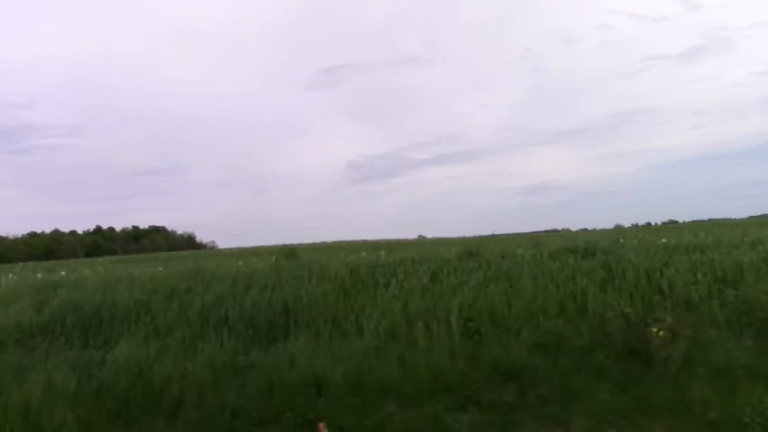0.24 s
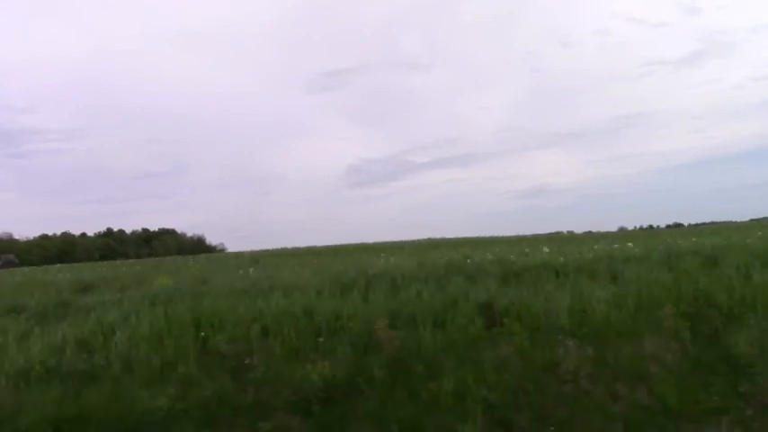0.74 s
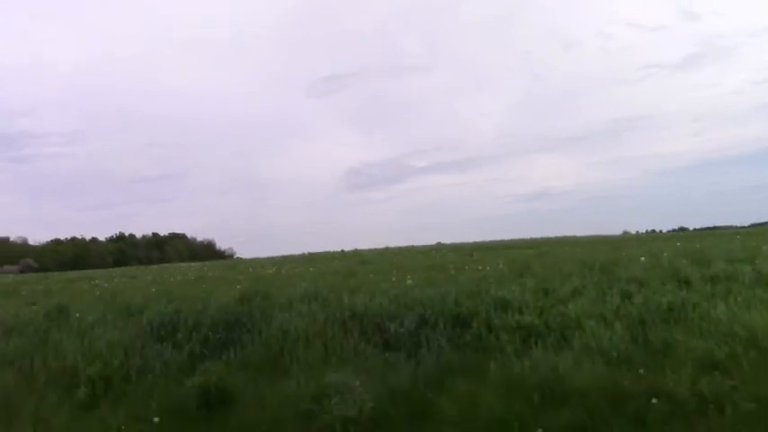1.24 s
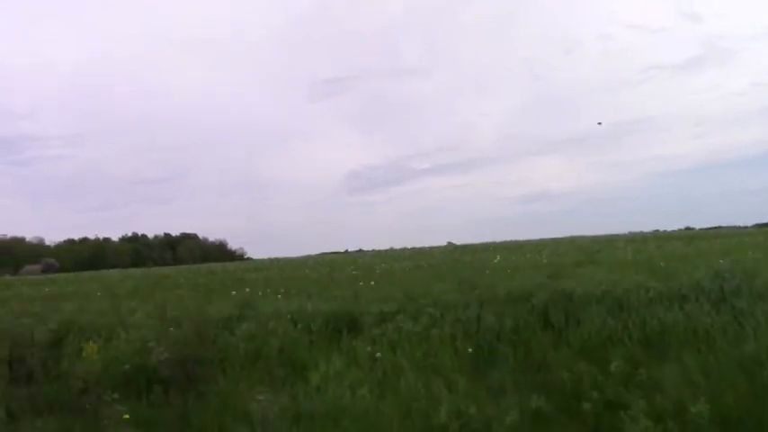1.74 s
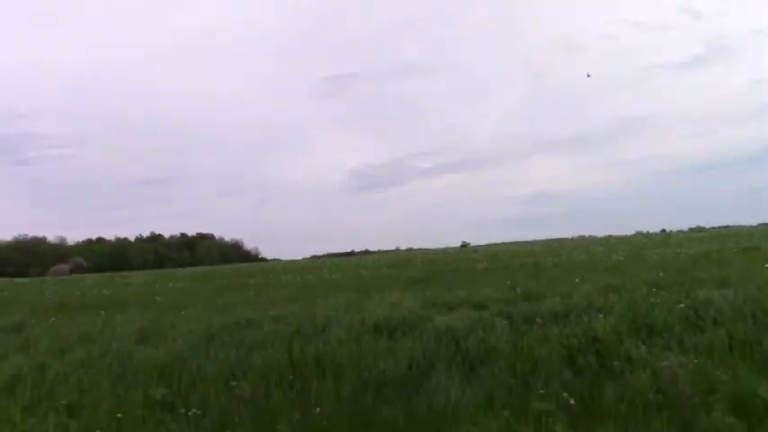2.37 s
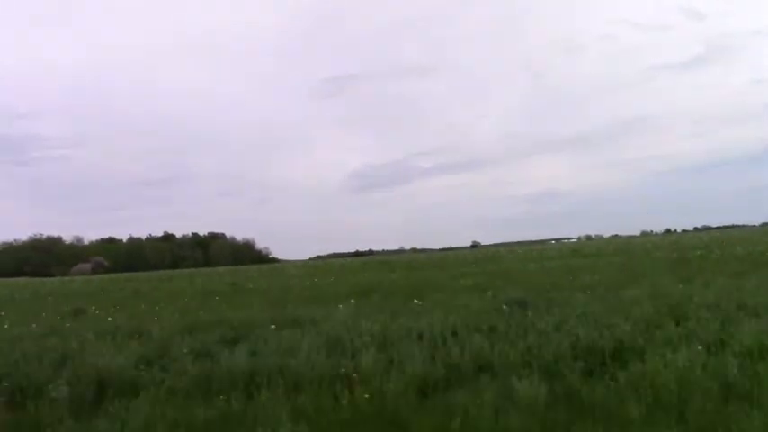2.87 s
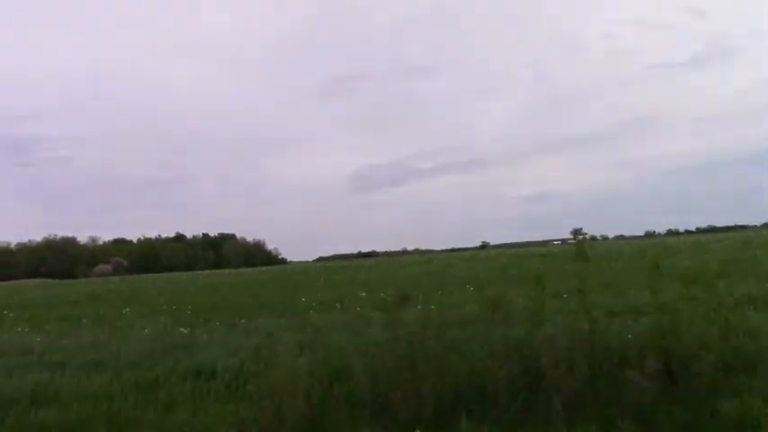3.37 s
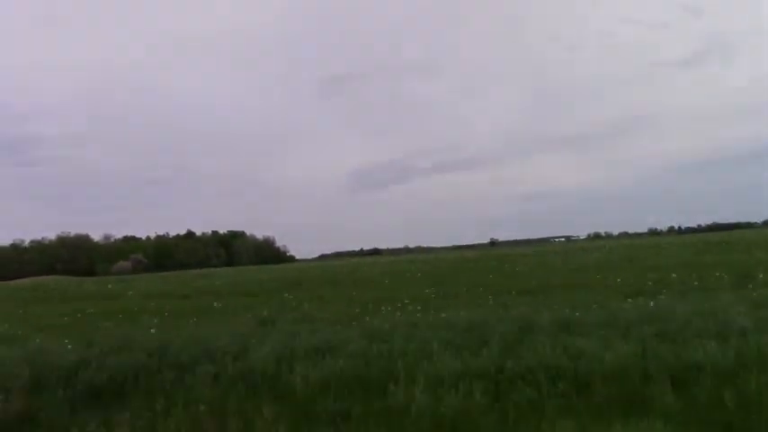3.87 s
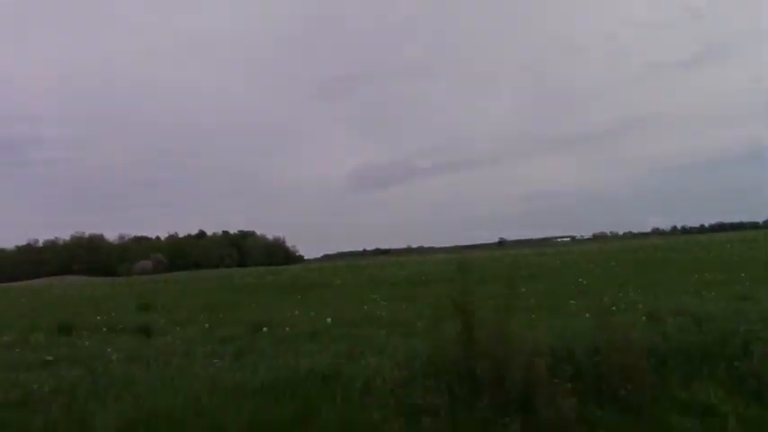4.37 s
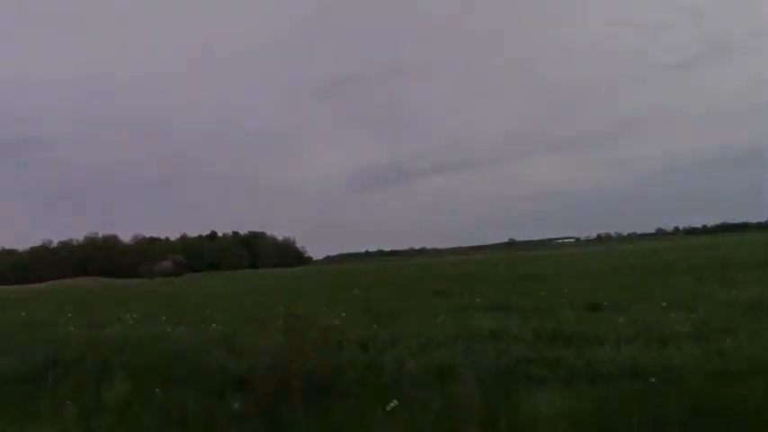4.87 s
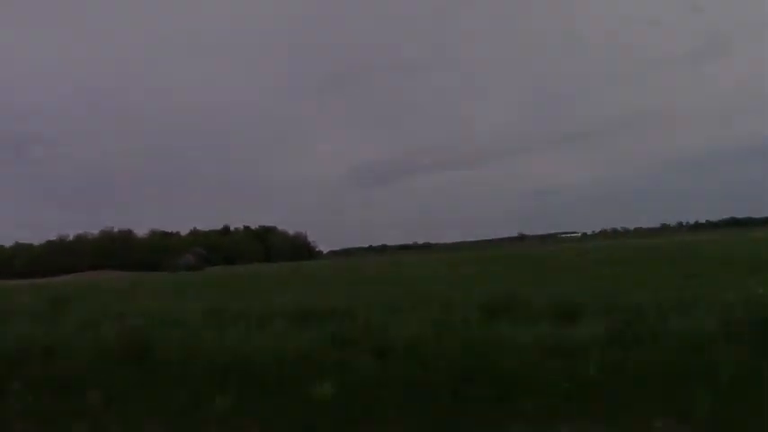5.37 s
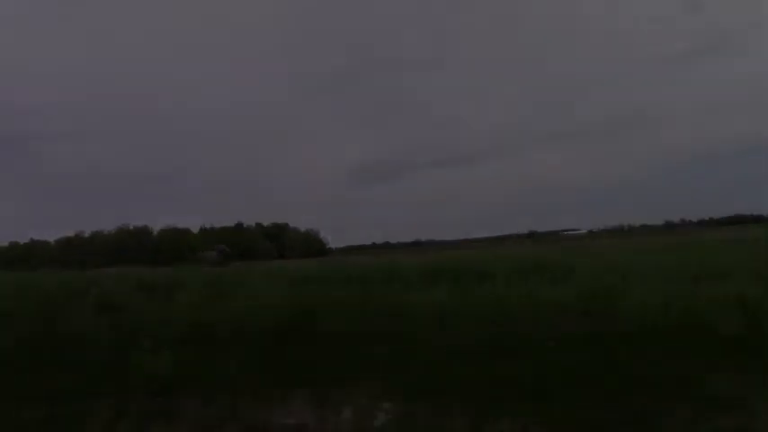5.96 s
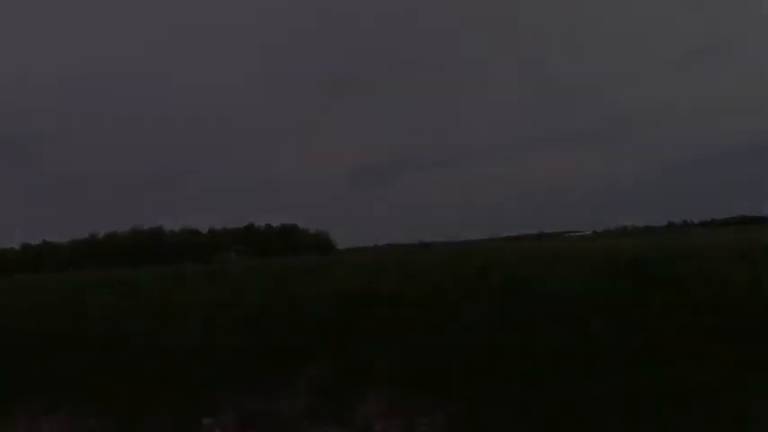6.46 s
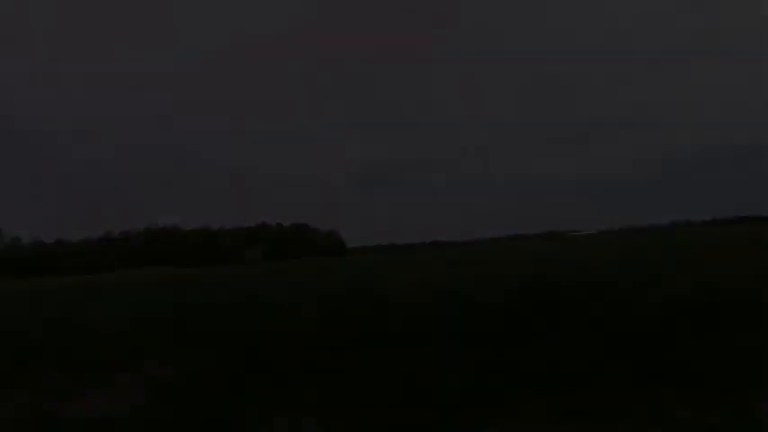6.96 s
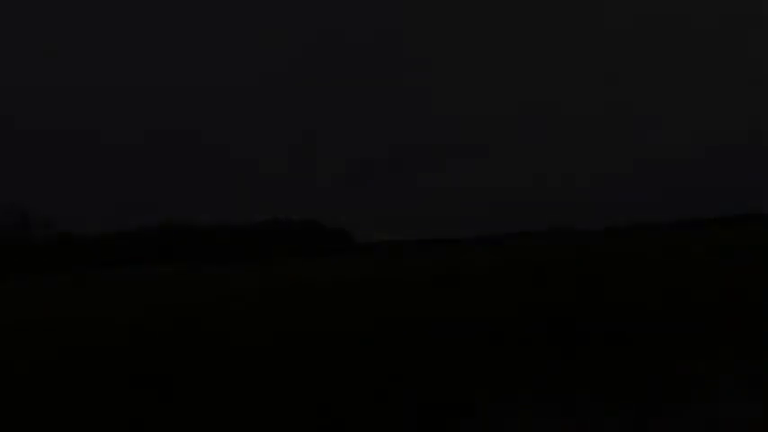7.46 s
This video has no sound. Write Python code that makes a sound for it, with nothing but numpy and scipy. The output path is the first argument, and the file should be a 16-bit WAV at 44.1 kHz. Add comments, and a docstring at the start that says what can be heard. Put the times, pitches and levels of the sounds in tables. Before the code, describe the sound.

From 0 s, a full, close roar of wind is already running, as though the microphone sits at the open window of a vehicle crossing a grassy field. Deep rumble around 100 Hz and stronger buffeting at 150 to 500 Hz carry the weight; a softer rush up to about 1.5 kHz sounds hollow through narrow wavering resonances, and a thin hiss lies far beneath. Quick flutters and small surges ripple through, with a brief rumble dip near 0.4 s and fuller buffets around 1.1, 1.8 and 2.8 s. The image is nearly mono. At about 3.1 s a long even fade begins. A tiny dry tick comes near 3.7 s, with fainter ones until 6.1 s. Soft low puffs touch the microphone around 5.2 and 6.7 s, the wind still fluttering as it dwindles to silence at 7.7 s.

```python
"""A grassy field, crossed by a camera that is probably at the open window of a vehicle, with wind streaming past.
The wind is four bands of patchy noise: deep rumble, buffeting, a rush and an edge hiss. Surges, lulls and
flutter move their levels, and narrow wavering resonances make them sound hollow. Short swells of low noise are
puffs that strike the microphone ports, and quick bursts of bright noise are something small ticking nearby.
Partway through, a long straight fade begins and takes everything to silence."""
import sys
import numpy as np
from scipy import signal
from scipy.fft import rfft, irfft, next_fast_len
from scipy.io import wavfile
from scipy.ndimage import uniform_filter1d, map_coordinates

SR = 44100
rng = np.random.default_rng(int(sys.argv[2]) if len(sys.argv) > 2 else 0)


def wav_record(signal):
    """Record a signal, one row per channel, as 16-bit PCM in the file named by sys.argv[1]."""
    frames = np.transpose(np.atleast_2d(signal))
    bounded = np.clip(frames, -1, 1)
    # unit amplitude maps onto the largest positive 16-bit level
    quanta = np.round(bounded * 32767).astype(np.int16)
    wavfile.write(sys.argv[1], SR, quanta)


N = 340452


def amp(db):
    """Decibels to gain."""
    return 10 ** (np.asarray(db) / 20)


def unit(x):
    """Scale to rms 1."""
    return x / np.sqrt(np.mean(x ** 2) + 1e-20)


def along(points, hz):
    """Read (frequency, value) points on a log frequency axis."""
    f, v = np.transpose(points)
    return np.interp(np.log(hz + 1), np.log(f + 1), v)


def curve(rows):
    """Read (time [s], value) rows at every sample, with straight lines between them."""
    return np.interp(np.arange(N) / SR, *np.transpose(rows))


def wobble(knots_per_s, times_s):
    """A smooth random curve through normally distributed knots, read at the given times."""
    knots = rng.standard_normal(4096)
    return map_coordinates(knots, [times_s * knots_per_s], mode="mirror")


def filtered(x, response):
    """Shape the spectrum of x with a gain that is a function of frequency."""
    size = x.shape[-1]
    m = next_fast_len(size + SR // 4)  # padding keeps the tail from wrapping round
    gain = response(np.fft.rfftfreq(m, 1 / SR))
    return irfft(rfft(x, m) * gain, m)[..., :size]


def ticks():
    """Each tick is a few quick, dry contacts: bursts of bright noise that decay exponentially."""
    # light ticks near the microphone: (main contact [s], level before the contact's own [dB], bright pitch [Hz])
    tick_rows = [(3.6805, -37.5, 10500), (4.277, -60, 13400), (4.954, -63, 13100), (5.406, -59, 12600),
                 (5.874, -54, 13000), (6.115, -60, 12500)]
    # colour of a tick: (multiple of its bright pitch, level [dB])
    tick_colour = [(.3, -22), (.5, -9), (.68, -1), (.85, 2), (1.03, 6), (1.18, 1), (1.35, -7), (1.5, -10.5)]
    # contacts within one tick: (time from the main contact [s], level [dB], t60 [s])
    contacts = [(-.002, -2, 0.013), (0, 6.5, 0.006), (.001, -4.5, .058), (.0095, -8.5, .02)]
    attack_s = .0001
    t = np.arange(SR // 10) / SR
    out = np.zeros(N + SR)
    for s, db, bright_hz in tick_rows:
        band = lambda hz: amp(along(tick_colour, hz / bright_hz))
        for delay, contact_db, t60 in contacts:
            envelope = amp(-60 * t / t60) * (1 - np.exp(-t / attack_s))
            noise = unit(filtered(rng.standard_normal(len(t)), band))
            start = round((s + delay) * SR)
            out[start:][:len(t)] += amp(db + contact_db) * noise * envelope
    return out[:N]


def puffs():
    """An eddy that lands right on the microphone thumps each port with its own low noise."""
    # eddies landing on the ports: (middle [s], length [s], level [dB], left minus right [dB])
    puff_rows = [(0.118, 0.16, -38, 0), (1.815, 0.15, -38, 6), (2.01, 0.046, -33, 6), (5.22, 0.04, -22, -4),
                 (6.723, 0.15, -21.5, -5)]
    # colour of a puff: (frequency [Hz], level per Hz [dB])
    puff_colour = [(25, -19), (70, -7), (150, 2), (240, 0), (330, -4), (500, -16), (900, -28), (2500, -57),
                   (5000, -120)]
    t = np.arange(N) / SR
    out = np.zeros((2, N))
    pressure = unit(filtered(rng.standard_normal((2, N)), lambda hz: amp(along(puff_colour, hz))))
    for s, length, db, pan_db in puff_rows:
        swell = np.exp(-(2 * (t - s) / length) ** 4)  # flat-topped bump
        port_db = db + np.array([[pan_db], [-pan_db]]) / 2
        out += amp(port_db) * swell * pressure
    return out


def patches(depth_db):
    """Stereo noise whose bands swell and sink on their own as eddies of different sizes pass."""
    z = signal.stft(rng.standard_normal((2, N)), nperseg=512)[2]
    field = rng.standard_normal(z.shape[1:])
    field = uniform_filter1d(field, size=7, axis=0)  # across frequency
    field = uniform_filter1d(field, size=6, axis=1)  # across time
    return signal.istft(z * amp(depth_db * unit(field)), nperseg=512)[1][:, :N]


def hollow_db(hz, s):
    """Each resonance lifts a narrow band of whatever noise passes; its lift and frequency waver with the flow."""
    # resonances of the space around the microphone: (centre [Hz], width at half the lift [Hz], mean lift [dB])
    resonances = [(97.4, 44, 2.5), (175.6, 65, 7.5), (225, 38, 2.5), (296, 43, 6), (444, 25, 1.5),
                  (497, 24, 0), (617.6, 29.5, 6.5), (659.6, 28, 5.5), (725, 26, 5), (759, 60, 7.5),
                  (815, 34, 4.5), (903, 29, 6.5), (978, 60, 3.5), (1078, 19, 4), (1199, 40, 7.5),
                  (1305, 48, 3), (1380, 62, 6.5), (1555, 58, 7.5), (1620, 37, 2), (1696, 50, 3),
                  (2350, 30, 3), (3060, 70, 1), (3570, 220, 2)]
    sway_db, drift_share, knots_per_s = 0.87, 0.007, 2.993  # wavering of lift and of frequency, and its pace
    lift = 0
    for centre, width, db in resonances:
        tuned_hz = centre * (1 + drift_share * wobble(knots_per_s, s))
        peak_db = db + sway_db * wobble(knots_per_s, s)
        lift = lift + peak_db / (1 + (2 * (hz[:, None] - tuned_hz) / width) ** 2)
    return lift


def turbulence(colour, patchy_db):
    """Nearly mono noise of rms 1; the hollow rings in the part that both channels share."""
    # difference between the channels: (frequency [Hz], side level relative to the source colour [dB])
    side_width = [(30, -25), (100, -30), (200, -25.5), (400, -30.5), (600, -23), (1400, -20.5), (2500, -19),
                  (4500, -12.5), (7500, -18), (10500, -8.5), (15000, -11)]
    mid, side = filtered(patches(patchy_db), lambda hz: amp(along(colour, hz)))
    hz, s, z = signal.stft(mid, SR, nperseg=4096)
    mid = signal.istft(z * amp(hollow_db(hz, s)), SR, nperseg=4096)[1][:N]
    side = filtered(side, lambda hz: amp(along(side_width, hz)))
    return unit(np.array([mid + side, mid - side]))


def steadied(x, span_s):
    """Even out swells slower than the span, keeping the quick flutter."""
    power = uniform_filter1d(np.mean(x ** 2, axis=0), max(int(span_s * SR), 1))
    return x / np.sqrt(np.abs(power) + 1e-9)


def airflow(level_db, colour, patchy_db):
    """Steadied turbulence whose loudness follows the given level."""
    return amp(level_db) * steadied(turbulence(colour, patchy_db), span_s=0.16)


def gusts(rows):
    """Change of level in dB: each surge or lull is bell-shaped, and overlapping ones add."""
    t = np.arange(N) / SR
    return sum(rise_db * np.exp(-(2 * (t - s) / length) ** 2) for s, length, rise_db in rows)


def wind():
    """Large eddies rumble and buffet, smaller ones rush, the finest hiss; each size has its own level changes."""
    # colour of each kind of turbulence: (frequency [Hz], level per Hz [dB])
    rumble_colour = [(22, -18.5), (60, -11.5), (88, 1.5), (115, 1), (150, -6.5), (220, -30.5), (500, -69)]
    buffet_colour = [(60, -34), (115, -11.5), (160, -3.5), (250, -4), (450, -3), (560, -11.5), (900, -37.5),
                     (2500, -73.5)]
    rush_colour = [(250, -46), (450, -9), (560, -2.5), (950, -0.5), (1450, -10.5), (1900, -12.5),
                   (2400, -23.5), (4000, -63), (7000, -120)]
    hiss_colour = [(1200, -17), (2200, 0), (2600, 3), (3050, 0), (3350, -6), (3800, -9.5), (5000, -13.5),
                   (7000, -16.5), (8500, -22.5), (11000, -28.5), (15500, -43)]
    # slow course of the deepest rumble and of the hiss at the edges: (time [s], level [dB])
    rumble_level = [(0, -22), (1, -24.5), (1.4, -27.5), (2.6, -27), (3.3, -24.5), (3.8, -25), (4.2, -26),
                    (5.2, -24.5), (6.6, -26.5), (7.7, -28.5)]
    hiss_level = [(0, -41.5), (3.8, -41), (4.7, -40), (5.6, -41), (6.3, -39.5), (7.2, -37.5), (7.7, -37.5)]
    # surges and lulls of rumble, buffeting and rush: (middle [s], length [s], rise [dB])
    rumble_surges = [(.37, 0.12, -11.5), (.65, .08, 1), (.79, .09, -4.5), (.97, 0.13, 4), (1.43, 0.06, 3),
                     (1.87, .08, 2.5), (2.1, .1, 3), (3.08, .08, 4), (3.46, .09, 2), (3.76, 0.077, -5),
                     (4.2, 0.22, 2), (4.55, 0.17, -4), (6.5, .09, 3), (7.1, 0.12, 0)]
    buffet_surges = [(.07, 0.082, -1), (0.206, 0.066, 2), (.36, .1, 0.8), (.69, 0.063, 0), (.83, 0.06, 1.8),
                     (.96, .08, 0.5), (1.09, 0.069, 3.2), (1.2, .06, 0), (1.29, 0.1, 0), (1.45, 0.12, 2),
                     (1.75, 0.25, 2.5), (2.086, 0.1, 2), (2.806, 0.048, 4), (2.98, 0.11, -1),
                     (3.16, .05, -2), (3.27, 0.21, 2), (3.46, .08, 1), (3.813, .2, -2), (3.996, 0.13, 1.7),
                     (4.194, 0.11, 2), (4.48, 0.067, -2), (4.76, 0.089, 3.5), (4.91, 0.081, 3),
                     (5.86, 0.17, 0.5), (6.16, 0.057, -1.5), (6.25, 0.068, 2), (6.52, 0.079, 3),
                     (6.985, .06, -4)]
    rush_swells = [(.16, 0.045, 2), (.7, 0.15, -1.1), (1.93, .08, 1.2), (2.75, 0.26, 0), (3.3, .25, 0),
                   (4.42, 0.2, -0.9), (4.68, 0.1, 2), (4.85, 0.078, 1.5), (5.2, 0.079, 2), (6.22, 0.14, 1),
                   (7.27, .18, 0.5)]
    buffet_db, rush_db = -18, -24  # steady levels under the surges
    t = np.arange(N) / SR
    # small eddies shake the rush, finer and quicker ones the hiss
    rush_flutter_db = 0.69 * wobble(70, t)
    hiss_flutter_db = 0.97 * wobble(130, t)

    rumble = airflow(curve(rumble_level) + gusts(rumble_surges), rumble_colour, patchy_db=1.0)
    buffet = airflow(buffet_db + gusts(buffet_surges), buffet_colour, patchy_db=0.05)
    rush = airflow(rush_db + gusts(rush_swells) + rush_flutter_db, rush_colour, patchy_db=0.5)
    hiss = airflow(curve(hiss_level) + hiss_flutter_db, hiss_colour, patchy_db=1.3)
    return rumble + buffet + rush + hiss


def scene():
    """Ticks, puffs on the ports and wind, a shade louder on the left."""
    balance_db = [[.15], [-.15]]  # left, right
    return (ticks() + puffs() + wind()) * amp(balance_db)


def record(dry):
    """A straight fade to silence, then the camera's band limit."""
    fade_start_s, fade_end_s, top_hz = 3.13, 7.712, 15750
    fade = curve([(fade_start_s, 1), (fade_end_s, 0)])
    return filtered(dry * fade, lambda hz: hz < top_hz)


dry = scene()
out = record(dry)
wav_record(out)
```